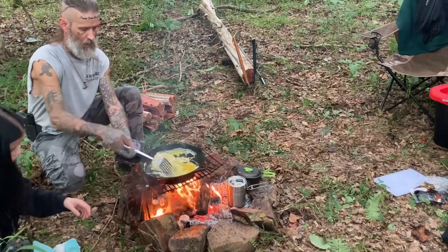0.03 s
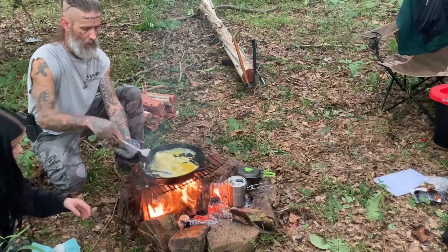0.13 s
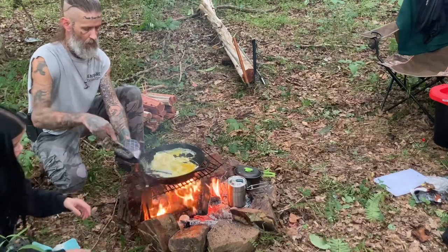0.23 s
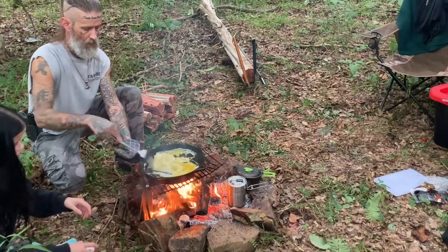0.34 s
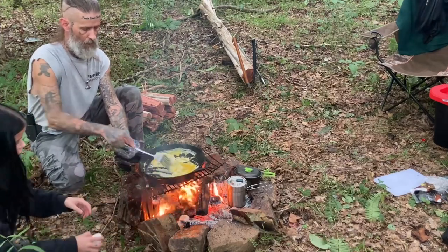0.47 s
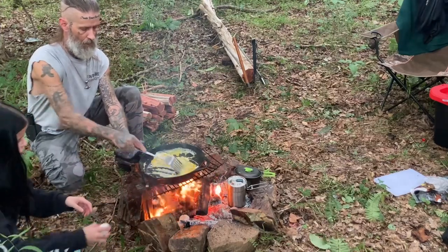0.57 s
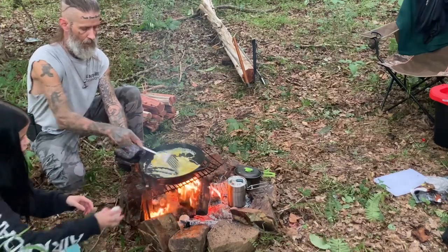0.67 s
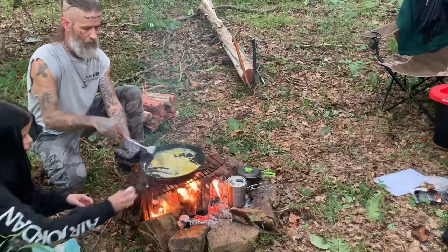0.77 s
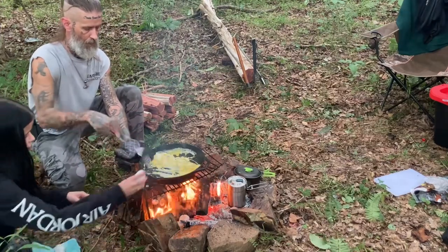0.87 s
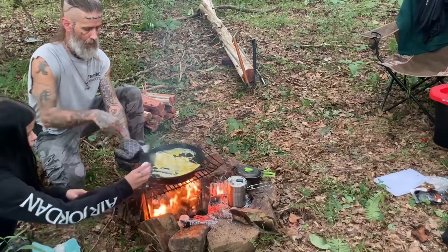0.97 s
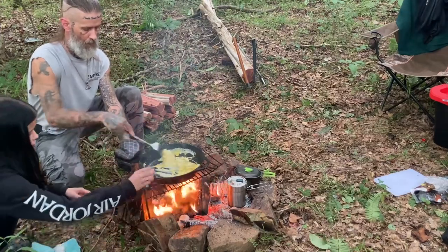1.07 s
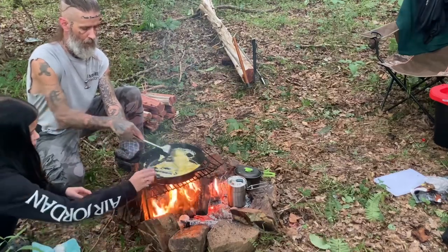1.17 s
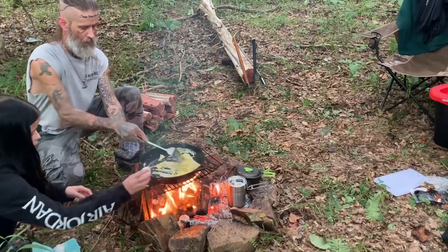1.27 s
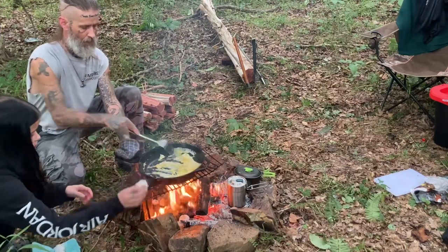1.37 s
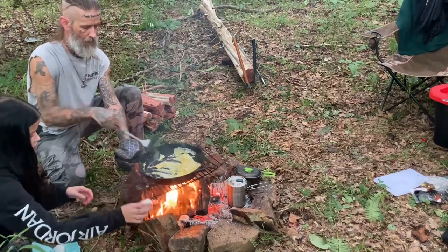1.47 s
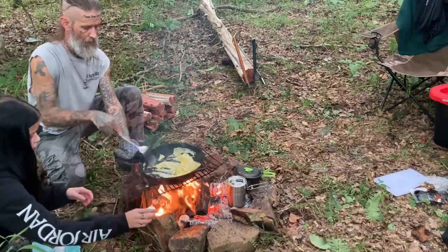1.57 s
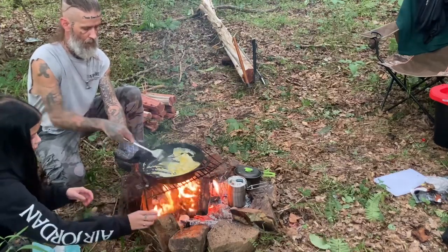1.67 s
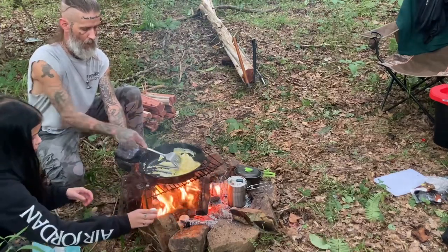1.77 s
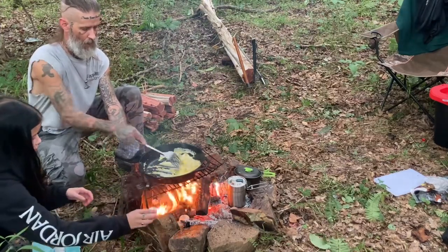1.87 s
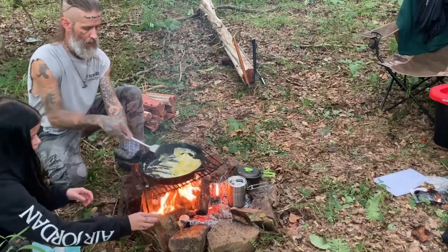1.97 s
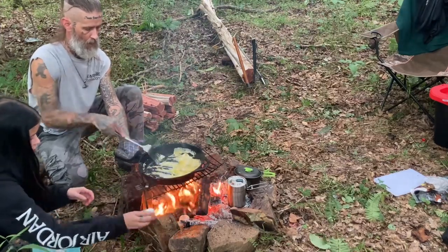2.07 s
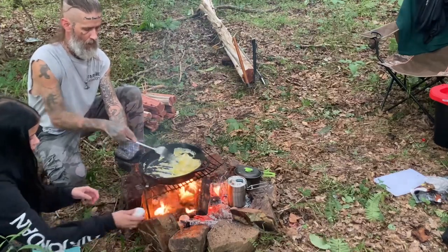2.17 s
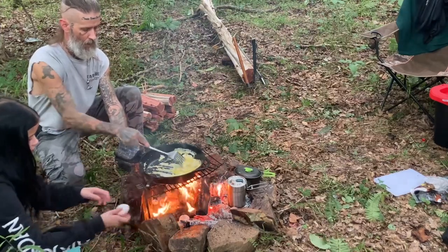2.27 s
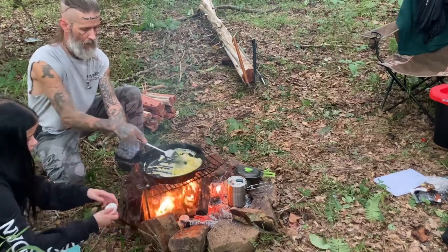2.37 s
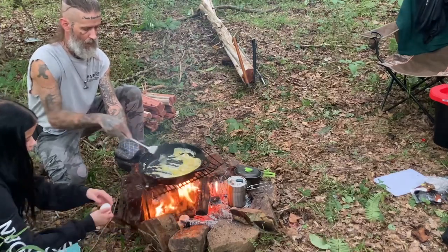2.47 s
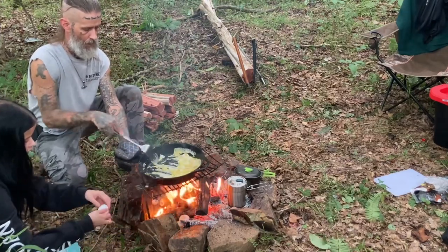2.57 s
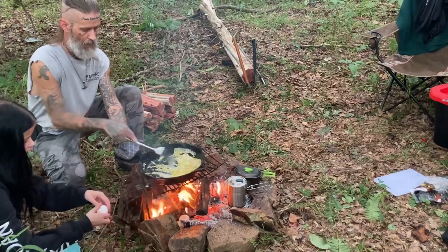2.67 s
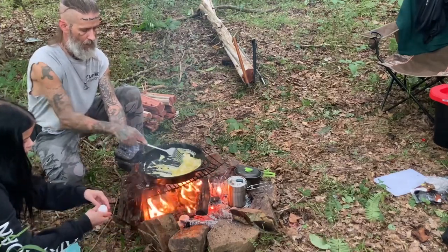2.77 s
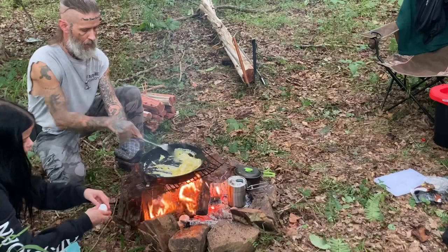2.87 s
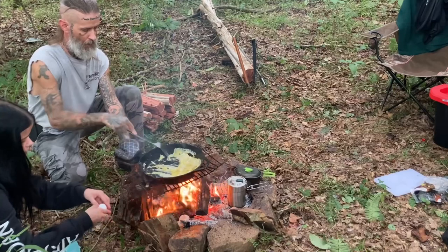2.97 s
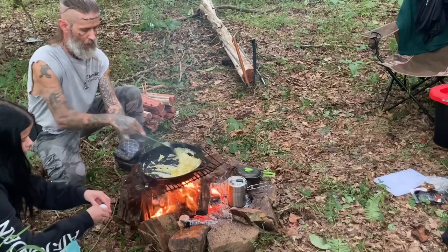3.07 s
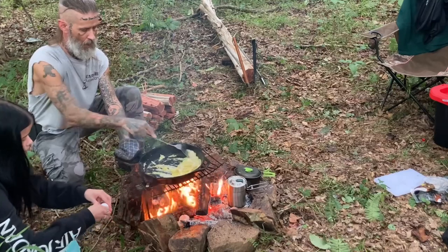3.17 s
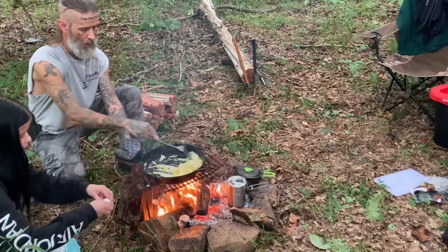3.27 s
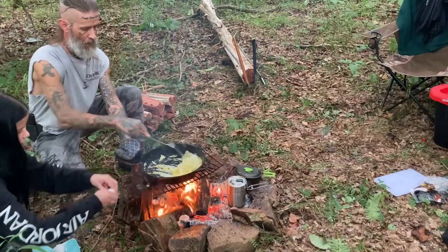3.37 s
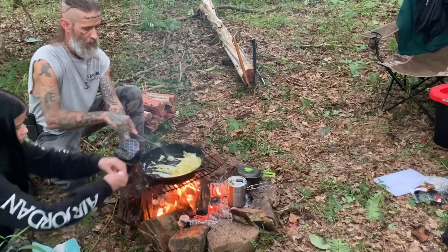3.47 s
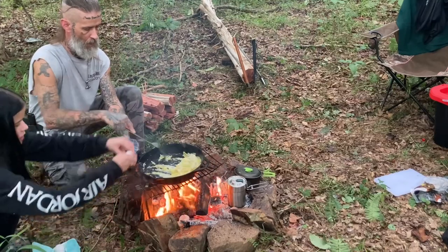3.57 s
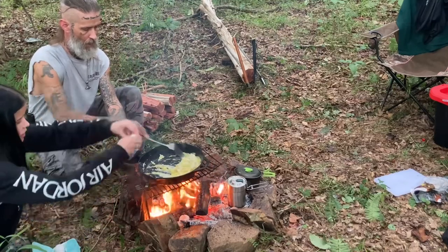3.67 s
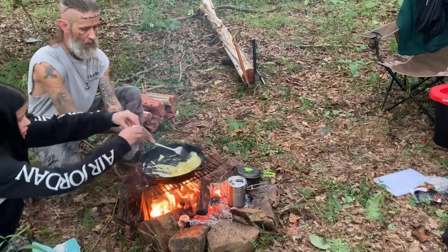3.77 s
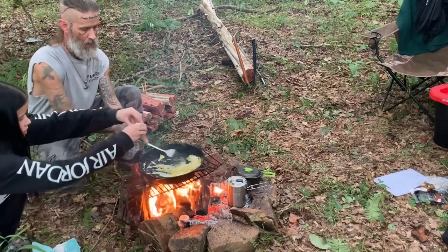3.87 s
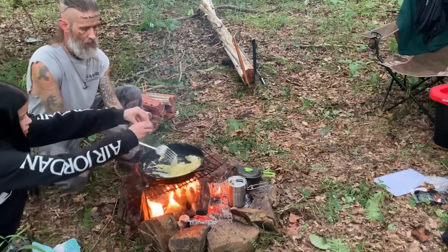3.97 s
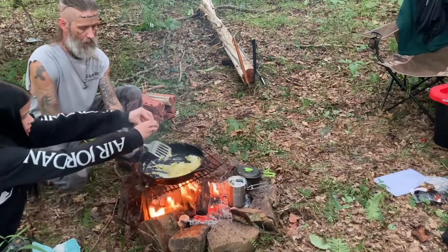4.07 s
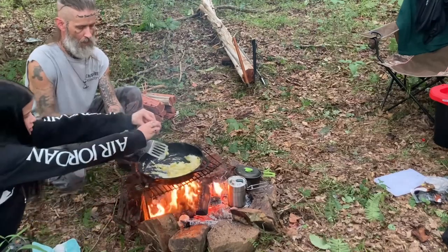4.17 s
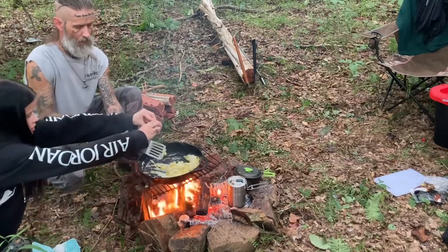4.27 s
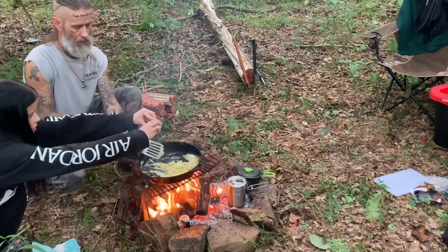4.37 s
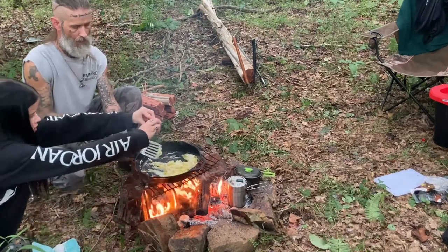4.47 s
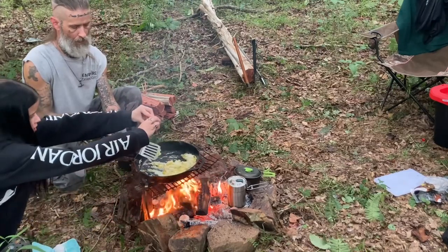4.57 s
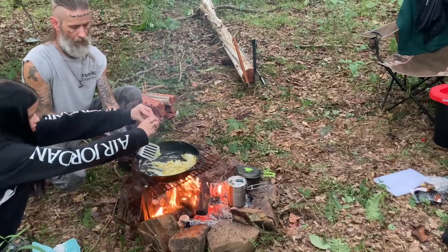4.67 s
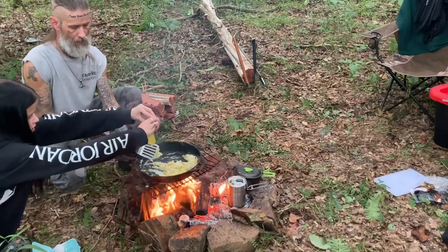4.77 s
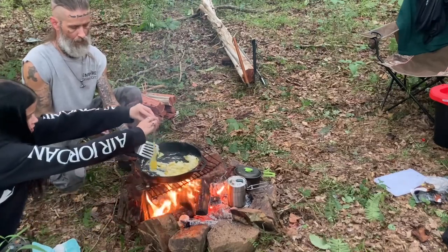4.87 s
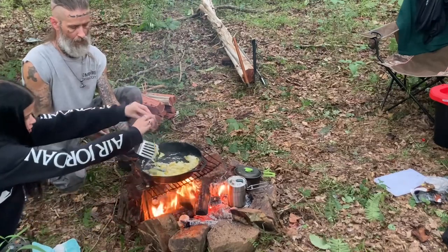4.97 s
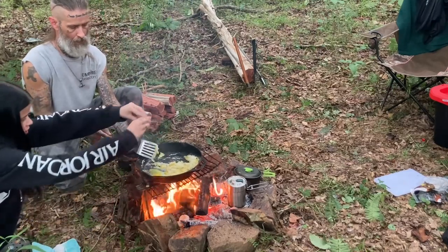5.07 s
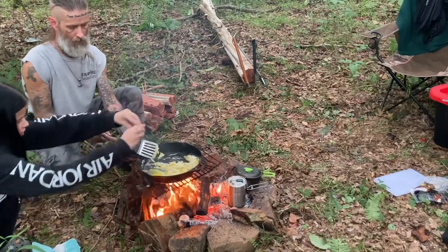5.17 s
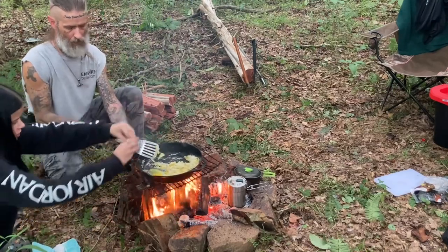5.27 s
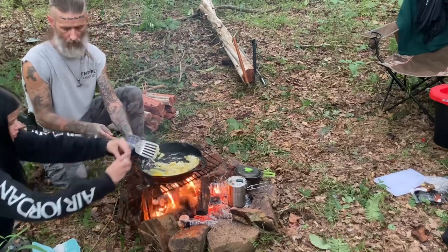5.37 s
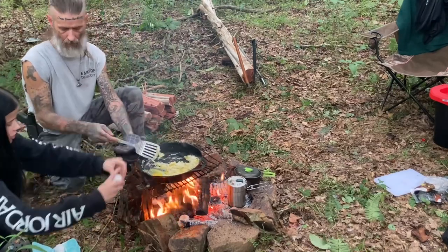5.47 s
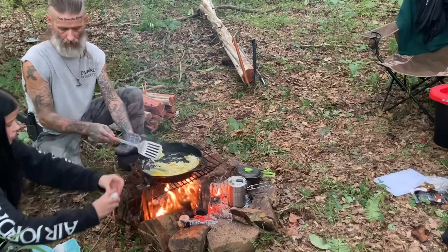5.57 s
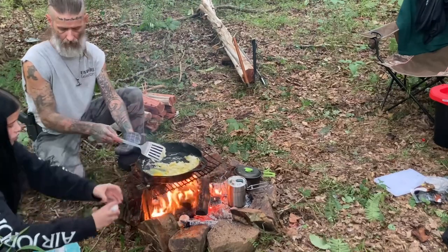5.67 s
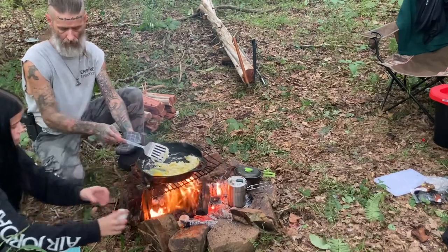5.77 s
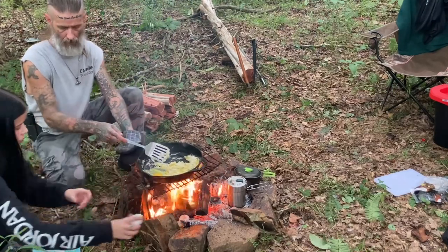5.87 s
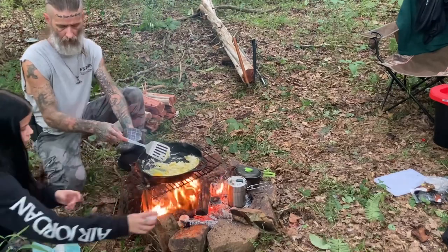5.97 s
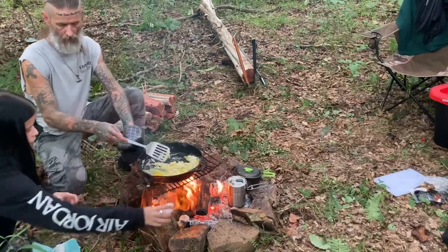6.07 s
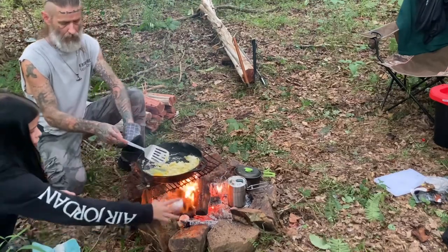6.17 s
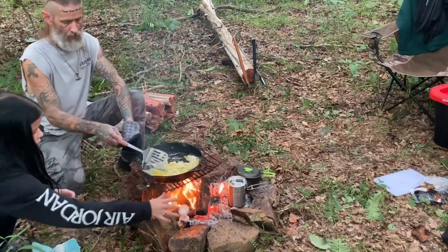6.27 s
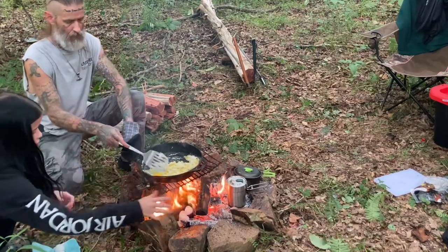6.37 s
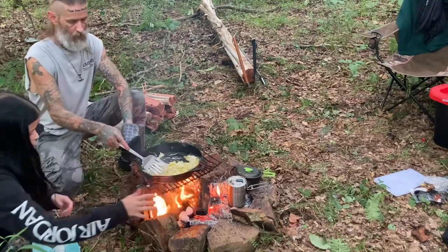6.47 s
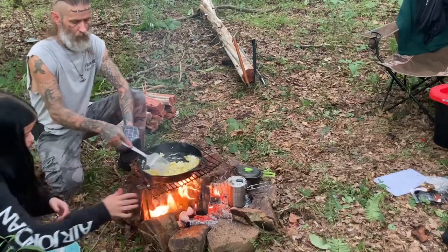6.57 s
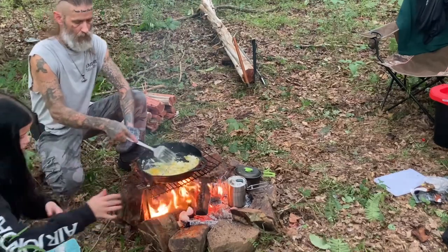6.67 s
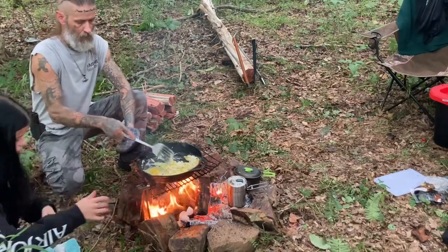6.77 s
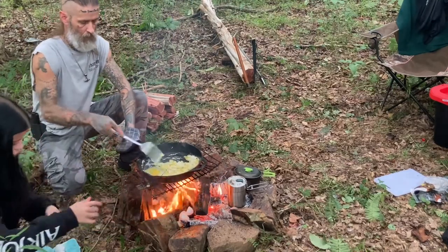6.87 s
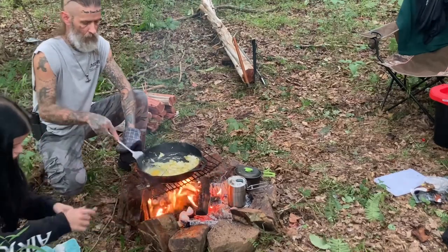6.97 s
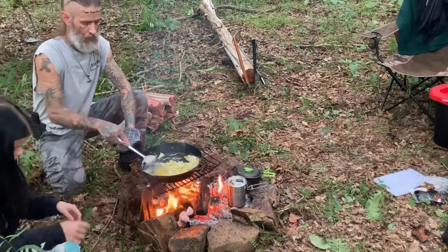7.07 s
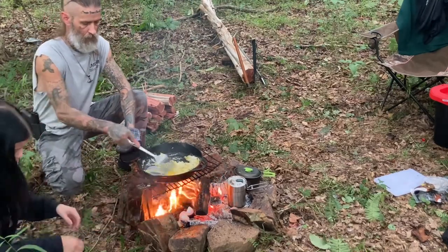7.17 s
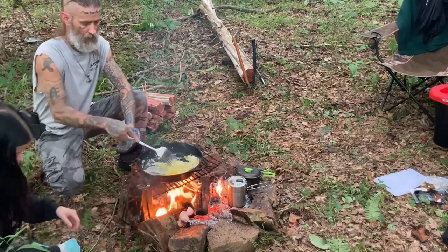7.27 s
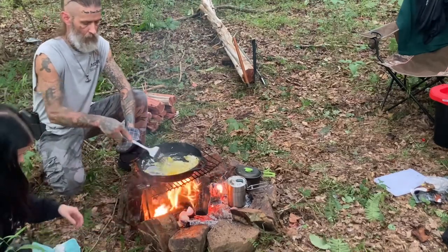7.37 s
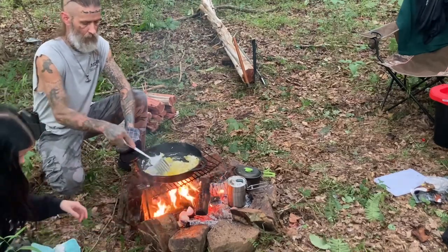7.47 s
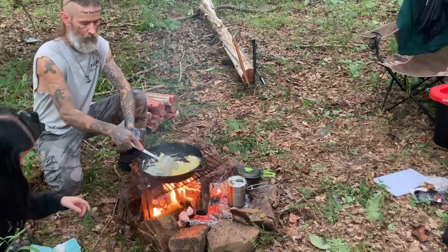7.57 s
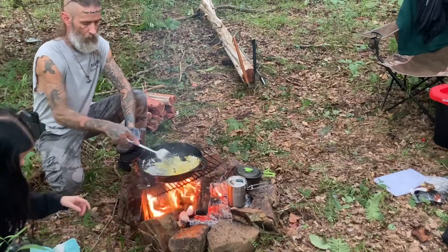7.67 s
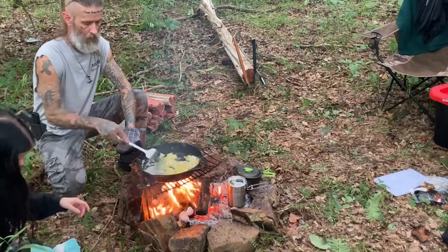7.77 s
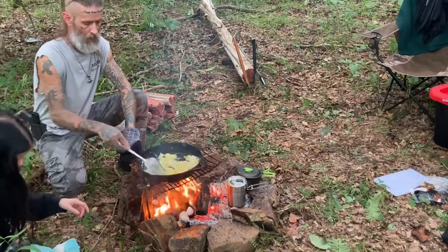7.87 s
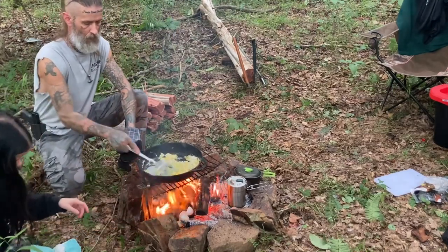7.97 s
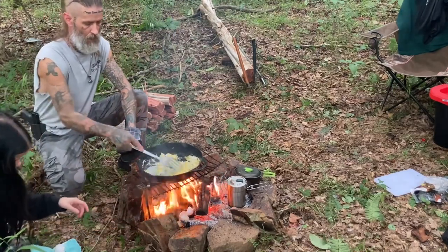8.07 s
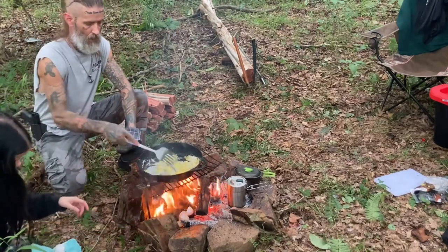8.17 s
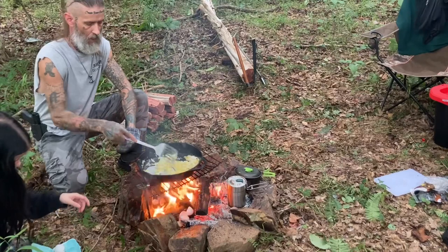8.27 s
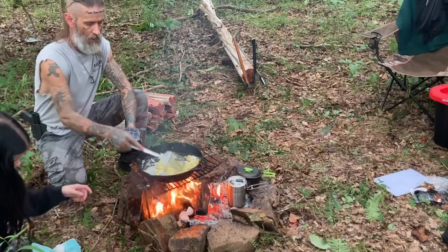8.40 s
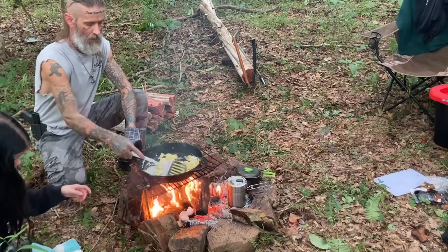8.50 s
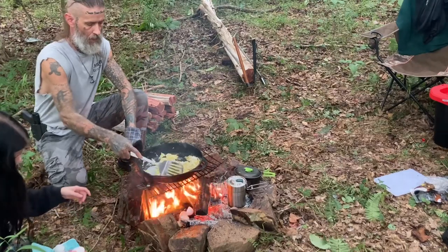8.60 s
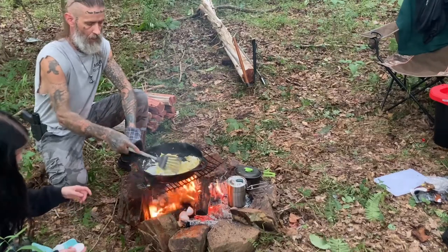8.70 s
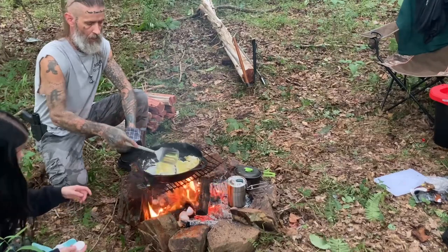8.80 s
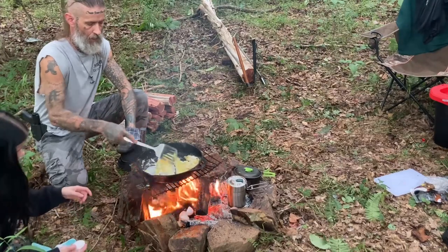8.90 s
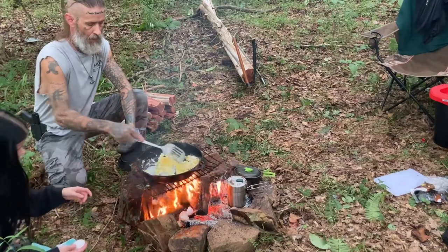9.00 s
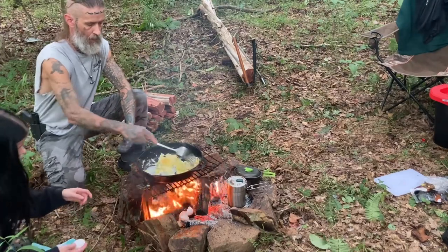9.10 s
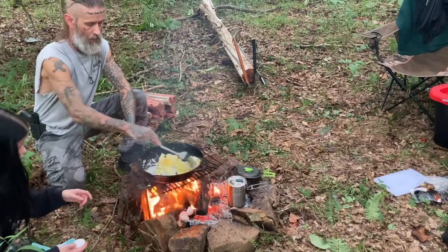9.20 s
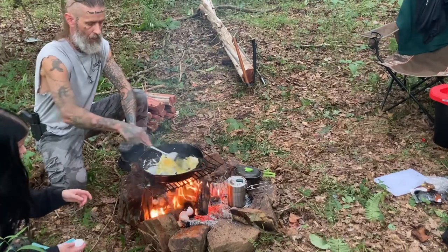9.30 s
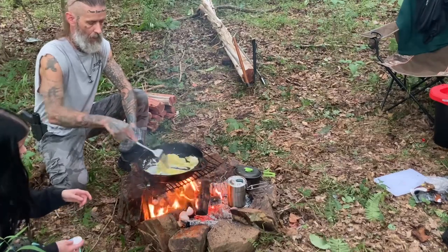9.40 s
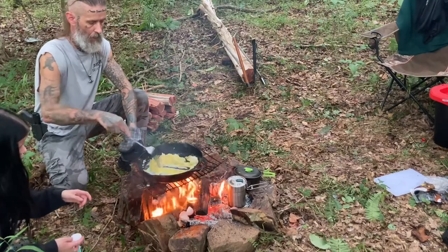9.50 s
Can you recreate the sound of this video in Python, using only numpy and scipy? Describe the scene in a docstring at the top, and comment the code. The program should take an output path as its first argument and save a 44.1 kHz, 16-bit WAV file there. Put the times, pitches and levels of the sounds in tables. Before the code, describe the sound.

Close outdoor stereo pickup of eggs frying over a wood fire. Fat fizzes and crackles above a low, lumpy flame flutter and a thin, steady insect buzz. A steel spatula taps and scrapes an iron skillet in short irregular strokes, bright and metallic. It stops for about three seconds while fat spits and an eggshell cracks in small hollow snaps, then returns with quieter, duller, egg-laden scrapes.

```python
"""Fat sizzles (clustered random clicks), a fire flutters (low noise), insects drone (a noise band).
A steel spatula soon taps an iron skillet (decaying modes) and scrapes it (stick-slip through resonances).
Fat and fire spit (filtered impulses); the fire puffs lowly from about 4 s on. The strokes pause from
about 3.7 s to 6.6 s, when most of an eggshell's cracks come (gliding damped tones); then most strokes
carry more egg. Two microphone ports a few centimetres apart hear it all."""
import sys
import numpy as np
from scipy import signal
from scipy.fft import rfft, irfft, next_fast_len
from scipy.io import wavfile
from scipy.ndimage import uniform_filter1d, map_coordinates

SR = 44100
rng = np.random.default_rng(int(sys.argv[2]) if len(sys.argv) > 2 else 0)


def master(y):
    """Save y as 16-bit WAV."""
    cut = np.clip(np.atleast_2d(y).T, -1, 1)
    pcm = np.round(cut * 32767)  # scale
    wavfile.write(sys.argv[1], SR, pcm.astype(np.int16))


N = 420713  # length in samples


def amp(db):
    """Decibel law: level in dB to amplitude."""
    return 10 ** (np.asarray(db) / 20)


def unit(x):
    """Normalisation to an rms of 1."""
    return x / np.sqrt(np.mean(x ** 2) + 1e-20)


def along(points, hz):
    """Interpolation of (frequency_hz, value) points on a logarithmic frequency axis."""
    f, v = np.transpose(points)
    return np.interp(np.log(hz + 1), np.log(f + 1), v)


def curve(rows, column):
    """Linear interpolation in time: one column of a table, one value per sample."""
    rows = np.asarray(rows)
    return np.interp(np.arange(N) / SR, rows[:, 0], rows[:, column])


def add(track, s, sound):
    """Superposition: lay a sound into a track at s seconds."""
    track[round(s * SR):][:len(sound)] += sound


def wobble(rate):
    """Slow random modulation: a smooth curve through `rate` random knots a second."""
    coarse = np.arange(0, N + 64, 64)
    knots = rng.standard_normal(int(N * rate / SR) + 4)
    values = map_coordinates(knots, [coarse * rate / SR])
    return np.interp(np.arange(N), coarse, values)


def filtered(x, response):
    """Linear filtering: the spectrum of x times a complex response of frequency."""
    m = next_fast_len(N + SR // 2)
    hz = np.fft.rfftfreq(m, 1 / SR)
    return irfft(rfft(x, m) * response(hz), m)[..., :N]


def coloured(x, spectrum):
    """Spectral shaping: x weighted by a spectrum and brought to an rms of 1."""
    return unit(filtered(x, lambda hz: amp(along(spectrum, hz))))


def grit(rate, spread_db, smooth):
    """Shot noise: `rate` random clicks a second of spread size, on a share of smooth noise."""
    size_db = spread_db * np.minimum(rng.exponential(size=N), 3)
    signs = np.sign(rng.standard_normal(N))
    clicks = (rng.random(N) < rate / SR) * amp(size_db) * signs
    return unit(clicks) + smooth * rng.standard_normal(N)


def patchy(x, depth_db):
    """Time-frequency modulation: random patches of gain across both axes."""
    z = signal.stft(x, nperseg=512)[2]
    field = uniform_filter1d(rng.standard_normal(z.shape), size=30, axis=0)
    field = uniform_filter1d(field, size=16, axis=1)
    return signal.istft(z * amp(depth_db * unit(field)), nperseg=512)[1][:N]


# spectrum of the frying fat: frequency_hz, relative_level_db
FAT_SPECTRUM = [(200, -17), (600, -11), (1200, -2), (2200, 1.5), (4000, 3.5), (6000, -4.5), (9000, 5.5),
                (12000, 2.5), (16000, -0.5)]
# course of the sizzle: start_s, level_db
SIZZLE_LEVEL = [(0.0, -58.5), (0.3, -55), (0.38, -51), (0.7, -55.5), (1.31, -49), (1.63, -48), (1.79, -50),
                (2.48, -50.5), (2.72, -49), (3.09, -49), (3.7, -52.5), (4.13, -52), (4.87, -55.5),
                (6.07, -59.5), (6.52, -59.5), (7.66, -59.5), (7.93, -55), (9.1, -61), (9.54, -54.5)]


def sizzle():
    """Shot noise of countless tiny bursts in the fat: a patchy fizz and sparser, clumped crackle."""
    bursts = coloured(grit(500, spread_db=7.5, smooth=1.46), FAT_SPECTRUM)
    fizz = amp(0.8 * wobble(10)) * patchy(bursts, depth_db=2)
    clumps = amp(-11 + 3.5 * wobble(6))
    crackle = clumps * coloured(grit(40, spread_db=4, smooth=0), FAT_SPECTRUM)
    return amp(curve(SIZZLE_LEVEL, column=1)) * (fizz + crackle)


# spectrum of the fire: frequency_hz, relative_level_db
FLUTTER_SPECTRUM = [(20, -33), (53, 3.5), (118, -1), (214, -5.5), (280, -13.5), (316, -11.5), (500, -18),
                    (650, -64)]
# low puffs of the fire: start_s, level_db
PUFFS = [(3.951, -59), (5.0, -60), (5.281, -56), (6.35, -55), (9.249, -56)]


def flames():
    """Amplitude-modulated low noise: the lumpy flutter of the fire, with a few stronger puffs."""
    puffs, t = np.zeros(N + SR), np.arange(SR // 5) / SR
    for s, db in PUFFS:
        add(puffs, s, amp(db - 60 * t / 0.24) * np.minimum(t / 0.0016, 1))
    steady = amp(-68.0 + 2.5 * wobble(24))
    return (steady + puffs[:N]) * coloured(rng.standard_normal(N), FLUTTER_SPECTRUM)


# spectrum of the chorus: frequency_hz, relative_level_db
INSECT_SPECTRUM = [(5600, -29), (6300, -9.5), (6900, -4), (7200, -3.5), (7600, -9), (8200, -25.5)]


def insects():
    """Band-limited noise: many far singers merge into one fine, steady buzz."""
    level_db = -56.0 + 0.16 * wobble(1.86) + 0.13 * wobble(280)
    return amp(level_db) * coloured(rng.standard_normal(N), INSECT_SPECTRUM)


CLACK_DB, PING_DB = -15, -8  # clack and contact ping over the strength of the tap
REACH_DB_PER_OCTAVE = 3.5  # modes are hit less, the further they lie from the one hit best
HELD_DB, HELD_BELOW_HZ = -7, 2420  # a blow pins the blade and mutes its low modes
# taps of the blade on the pan: start_s, strength_db, thud_db (over strength), blade_ring_db,
# pan_ring_db (both over strength), best_hit_hz, place (0 wall to 1 floor)
TAPS = [(0.2297, -16, -13.5, -24.5, -30, 2740, 0.88), (0.35, -31.5, -25, -15, -22, 1770, 0.25),
        (0.8617, -14.5, -13.5, -15.5, -31, 4500, 0.24), (1.516, -20, -15.5, -33, -22, 1940, 0.26),
        (1.5748, -17, -11, -12, -35, 3450, 0.27), (1.6998, -23.5, -23, -30, -28, 5500, 0.3),
        (1.926, -30.5, 0.5, -19.5, -42, 900, .5), (2.0283, -14, -15, -17, -45.5, 2430, 0.17),
        (2.9199, -14.5, -16, -44, -20, 1880, 0.11), (6.32, -24.5, -13, -23, -30.5, 1720, 0.77),
        (6.5302, -40, 4.5, -4, -38, 2180, .5), (6.9783, -26.5, -15.5, -34, -22, 2000, 0.33),
        (7.0142, -30, -4, -11, -39, 1750, 0.41), (7.0481, -35.5, -14, -12.5, -20, 1680, 0.47),
        (8.111, -32, -21, -14, -16.5, 2580, 0.42), (8.4663, -22.5, -13.5, -22.5, -19.5, 2455, 0.72),
        (8.6637, -34.5, -25, -17, -14.5, 2380, 0.49), (8.7777, -42, -12, -11, -11, 1860, 0.29),
        (9.157, -28.5, -16.5, -22, -21.5, 2330, 0.49), (9.241, -30.5, -3.5, -33, -30, 2300, 0.08)]
# modes of the bare steel blade: frequency_hz, width_hz, level_db
BLADE_MODES = [(480, 55, -4), (920, 60, -5), (1060, 60, -2), (1625, 50, 0), (1885, 50, -2), (2130, 80, -2),
               (2372, 45, -2), (2490, 60, 1), (2780, 50, -2), (3390, 30, -3), (3900, 35, -3), (4365, 32, 0),
               (4788, 28, -5), (5470, 45, -3), (5706, 45, -3), (5846, 40, -4), (6082, 40, -4),
               (7110, 35, -6), (8025, 40, -10), (10450, 35, -9), (11090, 90, 1), (11500, 70, -5)]
# modes of the iron pan: frequency_hz, wall_level_db, floor_level_db (where struck), t60_s
PAN_MODES = [(668, -10, -18, .19), (1018, -9, -10, .48), (1343, -4, -9, .42), (1469, -3, -22, .5),
             (1507, -22, -6, .38), (1899, -1, -22, .45), (1987, -20, -2, .55), (2304, -20, 2, .5),
             (2532, -2, -6, .3), (3070, -8, 0, .25), (3547, -16, -3, .25), (5281, -8, -18, .25),
             (5980, -12, 2, .12), (6680, 2, -6, .13), (7607, 0, -12, .15)]
# spectrum of the clack: frequency_hz, relative_level_db
CLACK_SPECTRUM = [(500, -60), (1400, -1), (2600, 8), (4300, -6), (6500, 2), (9000, 5), (12000, 0.5),
                  (16000, -10)]
# spectrum of the thud: frequency_hz, relative_level_db
THUD_SPECTRUM = [(150, -17.5), (350, -9), (470, -3), (620, -5.5), (2000, -11)]


def tap_modes(best_hz, blade_db, pan_db, place):
    """Modal excitation: frequency, level and decay of each mode, by the place and pitch of the blow."""
    modes = []
    for hz, width, level in BLADE_MODES:
        held = HELD_DB * (hz < HELD_BELOW_HZ)
        modes.append((hz, level + blade_db + held, 6 / width))
    for hz, wall, floor, t60 in PAN_MODES:
        modes.append((hz, np.interp(place, [0, 1], [wall, floor]) + pan_db, t60))
    for hz, level, t60 in modes:
        reach = REACH_DB_PER_OCTAVE * abs(np.log2(hz / best_hz))
        yield hz, level - reach + rng.normal(0, 2.5), t60


def tapping():
    """Impact and modal decay: a clack of dense high partials, a thud, short blade and long pan rings."""
    clack, thud, ring = np.zeros((3, N + SR))
    t = np.arange(SR // 2) / SR
    two_decays = 2.13 * amp(-60 * t / 0.0092) + amp(-60 * t / 0.15)
    clack_shape = two_decays * np.minimum(t / 0.00041, 1)
    onset = np.minimum(t / 0.00085, 1)  # the modes build up during the contact
    for s, db, thud_db, blade_db, pan_db, best_hz, place in TAPS:
        add(clack, s, amp(db + CLACK_DB) * clack_shape)
        add(thud, s, amp(db + thud_db - 60 * t / 0.061) * np.minimum(t / 0.0016, 1))
        ping = onset * np.sin(2 * np.pi * best_hz * t)
        add(ring, s, amp(db + PING_DB - 60 * t / 0.03) * ping)
        for hz, level, t60 in tap_modes(best_hz, blade_db, pan_db, place):
            tone = np.sin(2 * np.pi * (hz * t + rng.random()))
            add(ring, s, amp(db + level - 60 * t / t60) * onset * tone)
    noise = rng.standard_normal((2, N))
    peaks_db = 7 * wobble(18)  # laid along frequency, it splits the clack into close partials

    def clack_response(hz):
        return amp(along(CLACK_SPECTRUM, hz) + peaks_db[(hz / SR * N).astype(int)])

    partials = unit(filtered(noise[0], clack_response))
    return clack[:N] * partials + thud[:N] * coloured(noise[1], THUD_SPECTRUM) + ring[:N]


PRESS_DB_PER_S, LIFT_DB_PER_S = 278, 324  # the blade bears down and comes away
SNAG_RISE_S, SNAG_T60_S = 0.006, 0.083
# strokes of the blade: start_s (full contact), lift_s, first_level_db, last_level_db,
# egg_share (on the blade, 0-1), dry_rasp_db (over scrape), tilt_db_per_octave
STROKES = [(0.376, 0.568, -38.5, -45.5, 0, -28, -3.5), (0.969, 1.216, -40, -39.5, 0.09, -18.5, -2.5),
           (1.601, 1.7, -34.5, -47, 0.09, -13, -1), (1.737, 1.784, -41, -44.5, 0.1, -7.5, -3),
           (2.11, 2.233, -41.5, -34.5, 0.2, -6.5, 1.5), (2.444, 2.553, -41.5, -42.5, 0.09, -10, -0.5),
           (2.627, 2.722, -39, -33.5, 0.05, -9.5, -0.5), (2.85, 2.871, -47.5, -51, 0.3, 1.5, 3.5),
           (3.087, 3.19, -40, -42.5, 0.13, -15, -3), (3.341, 3.512, -42.5, -47, 0.28, -8.5, 1.5),
           (3.602, 3.726, -43.5, -44, 0.09, -11, 0), (6.598, 6.666, -44.5, -50, 1, -9.5, 3.5),
           (7.096, 7.097, -54, -44, 0.54, -13, -1.5), (7.447, 7.54, -54.5, -52, 0.87, -17, -1),
           (7.641, 7.745, -45.5, -52, 0.96, -10, 1.5), (7.86, 8.046, -51, -57, 0.3, -9, -0.5),
           (8.113, 8.192, -48, -56, 0.87, -5, 0), (8.674, 8.795, -47.5, -45.5, 0.72, -12, -0.5),
           (9.328, 9.44, -41, -49, 0.25, -9, -1.5)]
# snags of the edge on crust: peak_s, level_db, note_hz
SNAGS = [(0.356, -40, 1080), (0.56, -50, 2130), (0.98, -42, 1864), (1.03, -43.5, 1870), (1.13, -43.5, 480),
         (1.16, -40.5, 886), (1.195, -44.5, 922), (1.745, -41.5, 2094), (2.151, -44, 2010),
         (2.554, -47, 2560), (2.658, -48, 1710), (2.735, -42.5, 2140), (3.114, -47.5, 441),
         (3.374, -44, 2320), (3.666, -47, 3120), (7.019, -44.5, 2480), (7.053, -45, 1596),
         (8.123, -43, 1540), (8.648, -46.5, 2295), (8.718, -43.5, 608), (8.751, -49, 1960),
         (9.35, -42, 2150)]


def pressure():
    """Contact force: strokes bear down, drag and lift; snags jump above. The nearest sets the manner."""
    push, manner, t = np.zeros(N), np.zeros((3, N)), np.arange(N) / SR
    for start, lift, first_db, last_db, *values in STROKES:
        drag_db = np.interp(t, [start, lift], [first_db, last_db])
        press_db = PRESS_DB_PER_S * np.maximum(start - t, 0)
        lift_db = LIFT_DB_PER_S * np.maximum(t - lift, 0)
        drag = amp(drag_db - press_db - lift_db)
        push += drag
        manner += drag * np.array(values)[:, None]
    manner /= push  # mean weighted by the force of each stroke
    for s, db, _ in SNAGS:
        rise = np.clip(1 + (t - s) / SNAG_RISE_S, 0, 1)
        push += amp(db - 60 * np.maximum(t - s, 0) / SNAG_T60_S) * rise
    return push, manner


NOTE_DB, NOTE_T60_S = 2, 0.11  # note over the level of its snag, and its decay


def snag_notes():
    """Release of a stuck edge: each jump makes one mode of the blade sing out roughly for a moment."""
    out, t = np.zeros(N + SR), np.arange(SR // 5) / SR
    decay = amp(-60 * np.maximum(t - SNAG_RISE_S, 0) / NOTE_T60_S)
    shape = np.minimum(t / SNAG_RISE_S, 1) * decay
    for s, db, hz in SNAGS:
        drift = np.cumsum(rng.standard_normal(len(t))) * 0.044  # roughness, as phase
        note = np.sin(2 * np.pi * hz * t + drift)
        add(out, s - SNAG_RISE_S, amp(db + NOTE_DB) * shape * note)
    return out[:N]


FLEX_SHARE, FLEX_BELOW_HZ = 0.04, 2700  # bending of the blade shifts its low modes
RUBBED_BELOW_HZ = 6200  # rubbing is too soft to ring the highest modes


def resonant(x, modes, tilt_db, wander_db):
    """Forced resonance: mode strengths wander with the contact, low pitches drift as the blade flexes."""
    out, t = np.zeros(N), np.arange(N) / SR
    bends = [np.cumsum(FLEX_SHARE * wobble(8)) / SR for _ in range(3)]  # shared among the modes
    rubbed = [mode for mode in modes if mode[0] < RUBBED_BELOW_HZ]
    for k, (hz, width, db) in enumerate(rubbed):
        bend = bends[k % 3] * (hz < FLEX_BELOW_HZ)
        turn = np.exp(2j * np.pi * hz * (t + bend))
        sharp = np.exp(-np.pi * width / SR)
        broad = np.exp(-4 * np.pi * width / SR)  # keeps the valleys between modes dark
        gain = (1 - sharp) * (1 - broad)
        ring = signal.lfilter([gain], np.poly([sharp, broad]), x * turn.conj())
        level_db = db + tilt_db * np.log2(hz / 1500) + wander_db * wobble(12)
        out += 2 * (ring * turn).real * amp(level_db)
    return out


BARE_DB, LOADED_DB = 12, 15  # how strongly the slips ring the blade
# modes of the blade loaded with egg: frequency_hz, width_hz, level_db
LOADED_MODES = [(580, 90, 0), (690, 80, -2), (1100, 60, -4), (1370, 60, -7), (1595, 50, 0), (1970, 70, -3),
                (2120, 70, -5), (2590, 120, 0), (2960, 70, -5), (3420, 80, -8), (4800, 90, -12),
                (5310, 80, -10)]
# spectrum of the dry rasp: frequency_hz, relative_level_db
RASP_SPECTRUM = [(1500, -7.5), (4000, -29), (7000, 11), (10500, 13), (13000, 5.5), (16000, -12)]


def scraping():
    """Stick-slip friction: the edge catches on crust in quick slips, which ring the blade and hiss."""
    push, (egg, rasp_db, tilt_db) = pressure()
    egg = np.clip(egg, 0, 1)
    chatter = amp(2.4 * wobble(70) + 1.5 * wobble(22))  # stick and slip
    slips = push * unit(chatter * grit(900, spread_db=2.5, smooth=0.37))
    bare = resonant(np.sqrt(1 - egg) * slips, BLADE_MODES, tilt_db, wander_db=3.2)
    loaded = resonant(np.sqrt(egg) * slips, LOADED_MODES, tilt_db, wander_db=3.5)
    hiss = coloured(chatter * grit(1500, spread_db=-3.0, smooth=0.58), RASP_SPECTRUM)
    rasp = push * amp(rasp_db) * hiss
    rung = amp(BARE_DB) * bare + amp(LOADED_DB) * loaded
    rung = filtered(rung, lambda hz: (hz / (hz - 300j)) ** 2)  # high-pass at 300 Hz
    return rung + rasp + snag_notes()


# spits of fat and pops of the fire: start_s, strength_db, low_reach_db (over strength)
SPITS = [(0.716, -34, -15), (1.355, -24.5, -44), (1.412, -23.5, -47), (1.812, -29, -35), (1.946, -28, -37),
         (2.1177, -24, -35), (2.154, -25, -35), (2.556, -32, -28), (2.829, -16, -47), (3.9697, -37, -12),
         (4.164, -23.5, -44), (4.2028, -30, -37), (4.242, -27, -31), (4.3503, -32, -23),
         (4.547, -27, -25.5), (4.5904, -31, -32), (4.731, -34, -22), (4.7606, -32, -34),
         (4.914, -34.5, -18), (5.0814, -31.5, -34), (5.293, -34, -23), (5.339, -24, -27.5),
         (5.377, -29, -29), (5.72, -28.5, -34), (5.848, -34.5, -25), (5.8545, -31.5, -27),
         (5.956, -40, -13), (6.195, -35, -21), (6.2647, -31, -30), (6.431, -32.5, -17), (6.6995, -39, -24),
         (6.825, -40, -14), (6.8459, -35.5, -10), (6.9233, -38, -24), (7.261, -30, -24), (7.883, -33, -11),
         (7.899, -34, -24), (8.554, -29, -23), (9.0733, -39.5, -5)]
# response of the bright tick: frequency_hz, gain_db
TICK_RESPONSE = [(1500, -44), (4000, -4.5), (8000, 0), (13000, 5.5), (16000, -8)]
# response of the low pop: frequency_hz, gain_db
POP_RESPONSE = [(300, -14), (900, 23), (2500, 25.5), (6000, 14)]


def spits():
    """Impulse response: bursts give a sharp bright tick with a spray; each also reaches lower by its own
    amount."""
    bright, low = np.zeros((2, N + SR))
    t = np.arange(SR // 50) / SR
    for s, db, low_db in SPITS:
        spray = 0.3 * amp(-60 * t / 0.015) * rng.standard_normal(len(t))
        burst = (t == 0) + spray
        add(bright, s, amp(db) * burst)
        add(low, s, amp(db + low_db) * burst)
    ticks = filtered(bright[:N], lambda hz: amp(along(TICK_RESPONSE, hz)))
    pops = filtered(low[:N], lambda hz: amp(along(POP_RESPONSE, hz)))
    return ticks + pops


SHELL_GLIDE = 0.04  # the hollow starts about this share sharp and sinks
# cracks of the eggshell: start_s, level_db, hollow_hz, t60_s
SHELL_CRACKS = [(4.482, -43.5, 533, 0.025), (4.598, -45, 3600, 0.03), (4.618, -26, 2600, 0.0063),
                (4.646, -26.5, 2100, 0.013), (4.749, -40, 1490, 0.019), (4.794, -39.5, 1590, 0.024),
                (4.858, -40.5, 1680, 0.032), (4.895, -42.5, 2280, 0.018), (5.006, -41, 930, 0.0082),
                (5.133, -33.5, 1224, 0.027), (5.179, -40, 1130, 0.028), (5.196, -36.5, 1175, 0.034),
                (5.277, -43, 1125, 0.055), (5.293, -37, 1230, 0.011), (5.394, -41.5, 1130, 0.055),
                (6.468, -34, 1400, 0.01)]


def eggshell():
    """Cavity resonance: a snap rings the hollow of the shell, roughly, as the crack runs on."""
    out, t = np.zeros(N + SR), np.arange(SR // 10) / SR
    for s, db, hz, t60 in SHELL_CRACKS:
        roughness = np.cumsum(rng.standard_normal(len(t))) * 0.078
        glide = 2 * np.pi * hz * SHELL_GLIDE * t60 / 7 * (1 - amp(-60 * t / t60))
        drift = roughness + glide
        tone = np.sin(2 * np.pi * hz * t + drift)
        tone += 0.15 * np.sin(2 * np.pi * 2.1 * hz * t + 2 * drift)
        hollow = amp(-60 * t / max(t60, 0.005)) * np.minimum(t / 0.0016, 1) * tone
        snap = 0.44 * amp(-60 * t / 0.0046) * rng.standard_normal(len(t))
        add(out, s, amp(db) * (hollow + snap))
    return out[:N]


# sound scattered by ground and stones: frequency_hz, level_db
SCATTER_LEVEL = [(100, -9), (1000, -12), (5000, -3), (6800, -7), (9000, -13), (15000, -4)]


def scattered(x):
    """Diffuse scattering: restless faint paths off ground, stones and smoke, different for each port."""
    hz, _, z = signal.stft(x, SR, nperseg=256)
    turn = np.exp(2j * np.pi * rng.random((2, *z.shape)))
    level = amp(along(SCATTER_LEVEL, hz))[:, None]
    return signal.istft(z * turn * level, SR, nperseg=256)[1][:, :N]


# phase between the ports: frequency_hz, left_lead_rad
PORT_LEAD = [(0, 0), (1890, .9), (4740, 2.9), (5600, 3.2), (6630, .9), (7490, -.5), (8600, -3),
             (9560, -3.3), (10700, -5.8), (12100, -6.6), (13200, -9.3), (14400, -9.6), (15200, -12.5),
             (16500, -12.6)]
# level between the ports: frequency_hz, left_minus_right_db
PORT_TILT = [(60, 1.5), (300, 1), (950, 4), (2400, 1.5), (5000, -1), (15000, -1.5)]


def scene():
    """Interaural-like differences: the left port leads in phase up to about 7 kHz and lags above."""
    x = sizzle() + flames() + insects() + tapping() + scraping() + spits() + eggshell()
    side = np.array([[1], [-1]]) / 2  # each port takes half of the difference
    lead_hz, lead = np.transpose(PORT_LEAD)

    def port_response(hz):
        return amp(side * along(PORT_TILT, hz)) * np.exp(1j * side * np.interp(hz, lead_hz, lead))

    return filtered(x, port_response) + scattered(x)


TOP_HZ = 15950  # band limit


def record(dry):
    """Band limitation: the microphones roll off the deepest bass; nothing is kept above the limit."""
    return filtered(dry, lambda hz: (hz / (hz - 35j)) ** 2 * (hz < TOP_HZ))


dry = scene()
out = record(dry)
master(out)
```